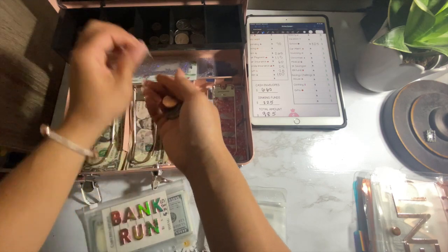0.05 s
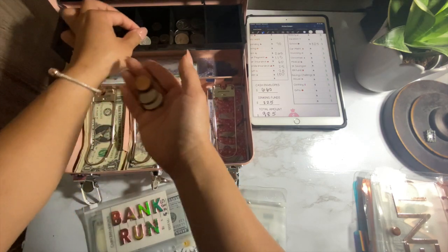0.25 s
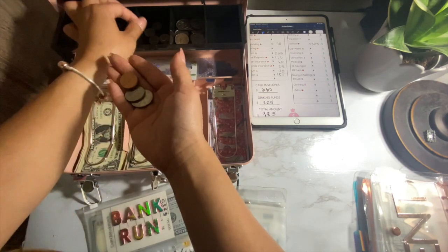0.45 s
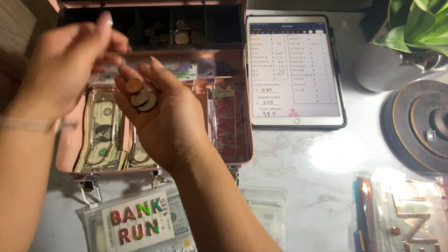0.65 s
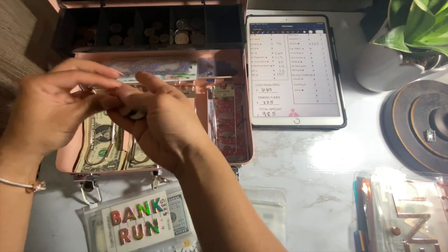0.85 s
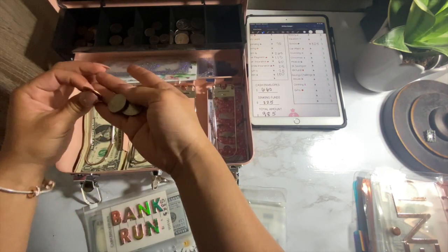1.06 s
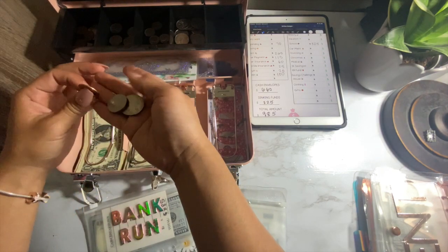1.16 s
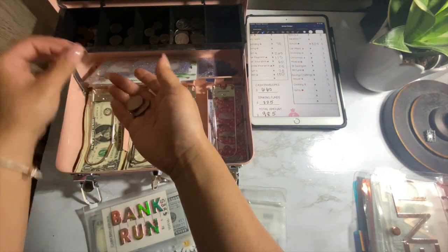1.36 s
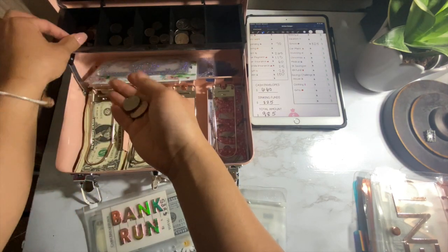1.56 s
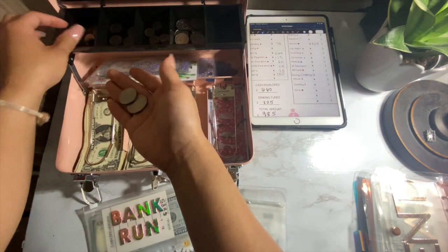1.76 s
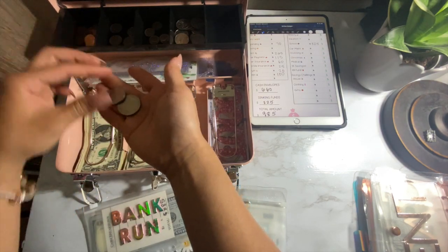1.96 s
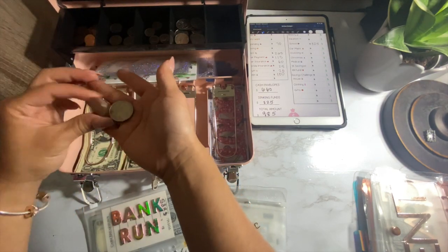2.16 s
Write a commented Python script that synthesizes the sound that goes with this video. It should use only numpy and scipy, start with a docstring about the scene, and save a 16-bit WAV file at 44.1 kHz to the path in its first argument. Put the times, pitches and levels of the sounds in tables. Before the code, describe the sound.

Coins clatter into a plastic cash box tray: a light box thump at 0.23 seconds, then a dense bright rattle from 0.35 to 0.5. Quiet sliding and tiny high ticks of handled coins follow until 1.4. A second, longer clatter runs from 1.53 to 1.95, with faint box metal ringing on the right. A last tick comes near 2.07, over low rumble and faint growing hum in a small room.

```python
"""In a small room, coins are dropped twice into the plastic tray of a metal cash box on a desk.
Each drop is a cluster of noise cracks and rattles with dying tray and coin modes; low modes give the
thump of the box, and its metal rings on after the second drop. Coins slide in the hand before and between
the drops (random grains under smooth strokes), and tick between and after them (snaps with paired partials).
Dense reflections with a room tail, a low rumble and a faint hum that grows stronger surround them."""
import sys
import numpy as np
from scipy import signal
from scipy.fft import rfft, irfft
from scipy.io import wavfile

SR = 44100
rng = np.random.default_rng(int(sys.argv[2]) if len(sys.argv) > 2 else 0)


def wav_out(sig):
    """Save sig, one row per channel (or a flat mono array), as 16-bit PCM at SR to the path in sys.argv[1]."""
    wavfile.write(sys.argv[1], SR, np.round(np.clip(np.atleast_2d(sig).T, -1, 1) * 32767).astype(np.int16))


N = 97020  # length in samples
ALIKE = 0.85  # correlation of the contact noises at the two microphones
RISE_S = 0.0011  # onset of one coin contact


def amp(db):
    """Level law: a gain is ten to the power of decibels over twenty."""
    return 10 ** (np.asarray(db) / 20)


def unit(x):
    """Normalisation: scales a signal to an rms of 1."""
    return x / np.sqrt(np.mean(x ** 2) + 1e-20)


def read(points, hz):
    """Interpolation along log frequency, on which hearing spaces pitch."""
    f, value = np.transpose(points)
    return np.interp(np.log(hz + 1), np.log(f), value)


def add(mix, s, sound):
    """Superposition: adds a sound to the mix from time s in seconds."""
    part = mix[:, max(round(s * SR), 0):][:, :sound.shape[-1]]
    part += sound[..., :part.shape[1]]


def colour(x, points):
    """Linear filtering: multiplies the spectrum by a gain curve of (Hz, dB) points."""
    n = x.shape[-1]
    gain = amp(read(points, np.fft.rfftfreq(n, 1 / SR)))
    return irfft(rfft(x) * gain, n)


def pair(n, alike):
    """Partial coherence: two microphones share one noise and the second adds its own."""
    a, b = rng.standard_normal((2, n))
    c = np.clip(alike, 0, 1)
    return np.array([a, c * a + np.sqrt(1 - c * c) * b])


def decay(t60, t):
    """Exponential decay: the level falls by 60 dB in t60 seconds."""
    return np.exp(-np.log(1000) * t / t60)


def die(x, t60s):
    """Frequency-dependent damping: overlapping bands each decay at their own rate."""
    n = x.shape[-1]
    t, hz, spectrum = np.arange(n) / SR, np.fft.rfftfreq(n, 1 / SR), rfft(x)
    centres = np.geomspace(125, 16000, 8)
    out = np.zeros(x.shape)
    for centre, weights in zip(centres, np.eye(len(centres))):
        band = irfft(spectrum * read(list(zip(centres, weights)), hz), n)
        out += band * decay(read(t60s, centre), t)
    return out


def ring(hz, t60, t):
    """Free vibration: a single mode is a sine that decays exponentially."""
    return np.sin(2 * np.pi * hz * t) * decay(t60, t)


def rumble():
    """Background noise: a random signal with a low spectrum, nearly alike at both microphones."""
    # Each row: frequency in Hz, relative spectral level in dB.
    spectrum = [(25, -27), (55, 1.5), (120, -4.5), (185, -1.5), (260, -16), (360, -11), (600, -30.5),
                (1500, -37.5), (6000, -37.5), (16000, -48.5)]
    return amp(-62.5) * unit(colour(pair(N, 0.98), spectrum))


def hum():
    """Steady tone: a faint sine whose level follows a slow curve."""
    # Each row: time in seconds, level in dB.
    levels = [(0, -69.5), (1.15, -71.5), (1.35, -58), (1.7, -54.5), (2.2, -53)]
    t = np.arange(N) / SR
    return amp(np.interp(t, *np.transpose(levels))) * np.sin(2 * np.pi * 150.1 * t)


def slides():
    """Sliding friction: coins scrape over each other in many random micro-impacts."""
    # Strokes of the fingers. Each row: start in seconds, length in seconds, level in dB.
    strokes = [(0.024, 0.37, -64), (0.553, 0.16, -62.5), (0.856, 0.16, -62.5), (0.96, 0.11, -59),
               (1.261, 0.07, -59), (1.336, 0.12, -58)]
    # Scrape spectrum. Each row: frequency in Hz, relative spectral level in dB.
    spectrum = [(300, -35), (2500, -25), (4200, -14), (5600, -0.5), (7800, -9), (10000, -6.5),
                (12000, -13.5), (13800, -18.5), (15600, -4), (17000, -15.5)]
    grains_per_s, grain_spread_db = 1200, 4
    strike = rng.random(N) < grains_per_s / SR
    grains = strike * amp(grain_spread_db * np.minimum(rng.exponential(1, N), 4))
    scrape = unit(colour(pair(N, ALIKE) * grains, spectrum))
    t = np.arange(N) / SR
    stroke_gain = np.zeros(N)
    for s, length, db in strokes:
        stroke_gain += amp(db) * np.sin(np.pi * np.clip((t - s) / length, 0, 1))
    return stroke_gain * scrape


def clack(db, body_db, treble_db, spot_hz, spot_db):
    """Impact excitation: broadband crack and rattle, modes of tray and coin, ring of the struck spot."""
    # Spectrum of crack and rattle. Each row: frequency in Hz, relative spectral level in dB.
    spectrum = [(20, -61.5), (60, -24), (250, -18), (600, -9.5), (1000, -6), (1350, -8.5), (1800, 2),
                (2600, -5.5), (3500, 2), (5600, -1), (7200, -4), (11000, -14), (12800, -11), (13900, -18.5),
                (15500, -10.5), (17000, -26.5)]
    # Extra colour of the crack. Each row: frequency in Hz, gain in dB.
    crack_colour = [(500, -5.5), (4000, 1.5), (9000, 3), (15000, 4)]
    # Damping of the rattle. Each row: frequency in Hz, t60 in seconds.
    rattle_t60 = [(200, 0.18), (1000, 0.073), (3500, 0.073), (8000, 0.054), (15000, 0.028)]
    # Modes of the tray and the coins in it.
    # Each row: frequency in Hz, level in dB before this blow's tilt and scatter, t60 in seconds.
    tray_modes = [(972.7, -32.5, 0.1), (1100, -41.5, .16), (1242, -37.5, 0.22), (1603, -33.5, .17),
                  (1919, -29.5, .08), (2046, -27, 0.056), (3170, -34, 0.16), (3500, -25, 0.089),
                  (3820, -26.5, 0.071), (3900, -30, 0.06), (4790, -25.5, 0.095), (5404, -30, 0.14),
                  (5740, -28.5, 0.07), (6760, -30.5, 0.04)]
    t = np.arange(SR // 4) / SR
    tilt = [(1300, body_db), (3000, 0), (5500, 0), (9000, treble_db)]  # (Hz, dB)
    noise = colour(unit(colour(pair(len(t), ALIKE), spectrum)), tilt)
    crack_s = 0.0028
    crack = amp(-16) * colour(noise, crack_colour) * np.exp(-(t / crack_s) ** 4)
    rattle = amp(-14.5) * die(noise, rattle_t60)
    modes = np.zeros(len(t))
    for hz, level, t60 in tray_modes:
        scatter_db = rng.standard_normal()
        mode_amp = amp(level + read(tilt, hz) + scatter_db)
        modes += rng.choice([-1, 1]) * mode_amp * ring(hz, t60, t)
    # every blow draws four bright coin partials
    partials = sum(ring(hz, 0.048, t) for hz in rng.uniform(7980, 13130, size=4))
    glitter = amp(-26 + treble_db) * partials
    spot = amp(spot_db) * ring(spot_hz, 0.036, t)
    return amp(db) * np.minimum(t / RISE_S, 1) * (crack + rattle + modes + glitter + spot)


def tray():
    """Repeated impact: both handfuls land, bounce and settle as separate blows."""
    # Coins striking the tray. Each row: start in seconds, level in dB, body in dB, treble in dB,
    # ring of the struck spot in Hz, level of that ring in dB relative to the blow.
    blows = [(0.2345, -17, 19, -1.5, 940, -13.5), (0.2365, -11.5, 9.5, -3.5, 3240, -8.5),
             (0.298, -26, 4.5, -9.5, 3237, -3.5), (0.342, -20, 1.5, -6, 2056, -20),
             (0.3514, -2, 0, -1.5, 2008, -7.5), (0.378, -2, 4, 0, 1780, -16.5),
             (0.3801, -1.5, -2.5, -4.5, 6030, -14), (0.3958, -2.5, -3, 4, 4060, -18),
             (0.408, -11.5, -1.5, 7, 4855, -14), (0.4333, -8.5, -6.5, 4.5, 12844, -6),
             (0.4396, -12, 0, 4.5, 3960, -19.5), (0.4448, -4.5, 0, 1.5, 3240, -10.5),
             (0.4605, -15, -3.5, 2, 3450, -16.5), (0.4806, -11.5, -3.5, -4.5, 3650, -13),
             (1.5249, -26, 2.5, -14, 3040, -14.5), (1.5354, 1, 3, -3.5, 3808, -14.5),
             (1.548, -5, 7.5, -11.5, 3805, -14.5), (1.575, -21, 19.5, -6, 1870, -0.5),
             (1.622, -21, -22.5, -7, 3560, -16.5), (1.6303, 0, -2, 1, 3525, -13.5),
             (1.6437, -6, 1, 4, 5340, -7.5), (1.6472, -2, 0, -2, 1673, -14),
             (1.681, -11, 6.5, -3, 3570, -16.5), (1.690, -12, 4, -8, 3650, -18),
             (1.7067, -9.5, -2, -4, 2161, -10.5), (1.7118, -12, 2, 0, 2033, -13.5),
             (1.7261, -4, 4.5, -3.5, 3532, -8.5), (1.7455, -7, -2, -7.5, 3760, -12),
             (1.757, -6.5, -6, 2, 3654, -17), (1.7635, -7.5, 1, -17, 3910, -34),
             (1.8064, -13.5, 0, -3.5, 2110, -14.5), (1.8579, -2, -0.5, 0, 3574, -7.5),
             (1.8603, -3.5, -4, -11.5, 4790, -20), (1.8798, -3.5, -5.5, -4.5, 3480, -11.5),
             (1.9144, -7.5, 1.5, -1.5, 3583, -8.5), (1.933, -11.5, -1, -8.5, 3570, -10)]
    out = np.zeros((2, N))
    for s, *row in blows:
        add(out, s, clack(*row))
    return out


def struck(modes, t):
    """Modal superposition: a struck body sounds as the sum of its modes after a soft onset."""
    rise_s = 0.012
    return np.minimum(t / rise_s, 1) * sum(amp(db) * ring(hz, t60, t) for hz, db, t60 in modes)


def box():
    """Modal response: the box thumps on the desk, and its metal rings on at the second drop."""
    # Box bumping the desk. Each row: start in seconds, level in dB.
    bumps = [(.236, -31.5), (.281, -32), (0.614, -49), (1.537, -38.5), (1.646, -38), (1.761, -40)]
    # Thump modes. Each row: frequency in Hz, level in dB relative to the bump, t60 in seconds.
    thump_modes = [(115.6, -2.5, 0.38), (135.9, -8, 0.37), (286.5, -6.5, 0.096)]
    # Metal modes. Each row: frequency in Hz, level in dB at the right microphone, t60 in seconds.
    metal_modes = [(320, -48.5, 2), (463.7, -45, 3.9), (470.7, -34, 0.74), (910, -62, 1.4),
                   (1764, -41.5, 1.58)]
    out, t = np.zeros((2, N)), np.arange(N) / SR
    thump = struck(thump_modes, t)
    for s, db in bumps:
        add(out, s, amp(db) * thump)
    side_gains = amp([[-19.5], [0]])  # left, right
    add(out, 1.537, side_gains * struck(metal_modes, t))
    return out


def ticks():
    """Damped impact: coins held in the fingers give a brief snap and two beating partials."""
    # Coins touching in the hand.
    # Each row: start in seconds, level in dB, ring in Hz, ring level in dB relative to the tick.
    touches = [(0.8111, -43.5, 9530, -6.5), (0.8172, -30, 9600, -22.5), (.826, -40, 9270, -15.5),
               (.8545, -43, 11740, -11), (.861, -31.5, 11430, -6), (0.9589, -38.5, 9520, -15.5),
               (0.9967, -43.5, 10920, -6), (1.02, -50.5, 10600, -5.5), (1.061, -52.5, 10840, -13.5),
               (1.278, -38, 10910, 3), (1.2954, -36.5, 11020, 0), (2.0661, -31, 9020, 3),
               (2.1237, -50.5, 8960, 0.5)]
    # Snap spectrum. Each row: frequency in Hz, relative spectral level in dB.
    spectrum = [(200, -29), (1500, -25.5), (3500, -21.5), (6000, -4.5), (7800, -6.5), (9500, 0.5),
                (11500, -9), (13700, -10.5), (15600, 4), (17000, -6.5)]
    snap_s, ring_t60, pair_hz = 0.0035, 0.035, 110  # the second partial lies pair_hz higher
    out, t = np.zeros((2, N)), np.arange(SR // 5) / SR
    for s, db, hz, ring_db in touches:
        snap = unit(colour(pair(len(t), ALIKE), spectrum)) * np.exp(-(t / snap_s) ** 2)
        ting = ring(hz, ring_t60, t) + 0.5 * ring(hz + pair_hz, ring_t60, t)
        add(out, s, amp(db) * np.minimum(t / RISE_S, 1) * (snap + amp(ring_db) * ting))
    return out


def room(x):
    """Reverberation by convolution: quick reflections from box and desk, then the room's tail."""
    # Colour of the quick reflections. Each row: frequency in Hz, gain in dB.
    near_colour = [(5000, -2), (14000, -2.5)]
    # Damping of the tail. Each row: frequency in Hz, t60 in seconds.
    tail_t60 = [(150, 0.6), (600, 0.73), (1800, 0.47), (5000, 0.49), (9000, 0.28)]
    # Colour of the tail. Each row: frequency in Hz, gain in dB.
    tail_colour = [(100, 2), (850, -11), (1650, -3), (3300, -11.5), (5500, -9.5), (9000, -10), (15000, -20)]
    near_t60, near_start_s, tail_rise_s = 0.13, 0.002, 0.017
    t = np.arange(SR * 3 // 4) / SR
    near = colour(rng.standard_normal((2, len(t))), near_colour)
    near = near * decay(near_t60, t) * (t > near_start_s)
    tail = die(rng.standard_normal((2, len(t))), tail_t60) * np.minimum(t / tail_rise_s, 1)
    echo = amp(-9) * unit(near) + amp(-9.5) * colour(unit(tail), tail_colour)
    echo /= np.sqrt(len(t))  # from rms to energy of the impulse response
    return signal.fftconvolve(x, echo, axes=1)[:, :N]


def microphones(drops, hand):
    """Level and phase differences: the left colours the tray, the right trails in phase."""
    # Tray at the left microphone. Each row: frequency in Hz, gain in dB.
    left_colour = [(900, -4.5), (2200, -1.5), (4500, -4.5), (8000, 0.5)]
    # Lag of the right microphone. Each row: frequency in Hz, phase lag in radians.
    right_lag = [(300, 1), (1500, 1.2), (5400, 1.12), (7000, 2.64), (9400, 5.23), (11300, 7),
                 (12900, 10.56), (16000, 10)]
    left = colour(drops[0], left_colour) + hand[0]
    right = drops[1] + hand[1]
    lag = read(right_lag, np.fft.rfftfreq(N, 1 / SR))
    right = irfft(rfft(right) * np.exp(-1j * lag), N)
    return np.array([left, right])


def scene():
    """Superposition: direct sound at two close microphones, reflections, box, hum and rumble."""
    hand = slides() + ticks()
    drops = tray()
    direct = microphones(drops, hand)
    reflected = room(drops + amp(-3) * hand)  # the hand excites the room less
    return direct + reflected + box() + hum() + rumble()


def record(dry):
    """Band limiting and saturation: cuts the deepest bass, rounds high peaks, then low-passes."""
    # Bass cut. Each row: frequency in Hz, gain in dB.
    low_cut = [(18, -14), (45, 0)]
    ceiling, edge_hz = 0.85, 16400
    dry = colour(dry, low_cut)
    held = dry / (1 + (dry / ceiling) ** 8) ** (1 / 8)
    low_pass = signal.firwin(255, edge_hz, window=("kaiser", 9), fs=SR)
    return signal.oaconvolve(held, low_pass[None], "same")


dry = scene()
out = record(dry)
wav_out(out)
```